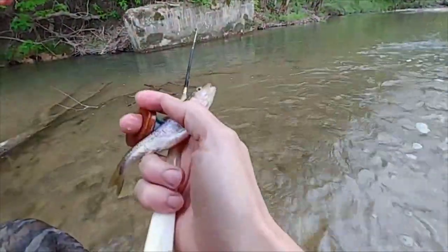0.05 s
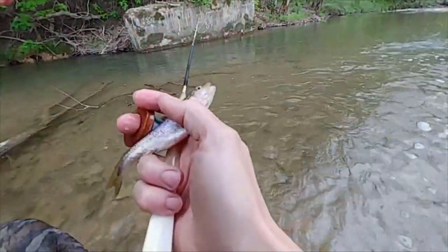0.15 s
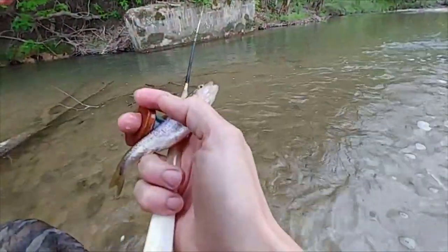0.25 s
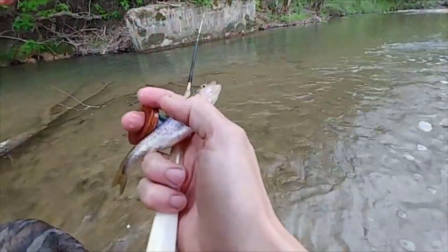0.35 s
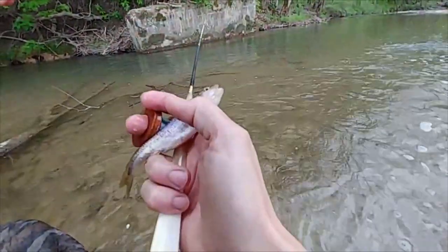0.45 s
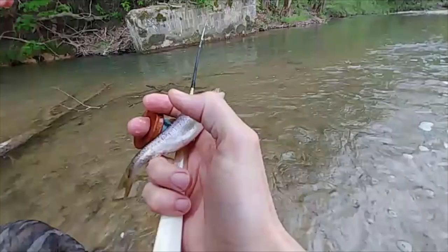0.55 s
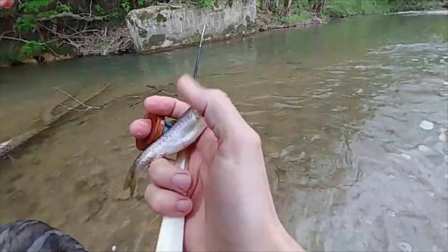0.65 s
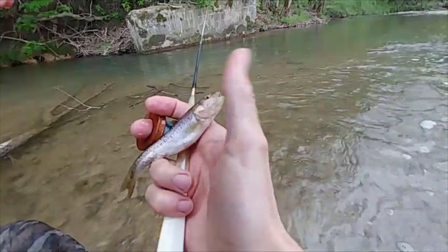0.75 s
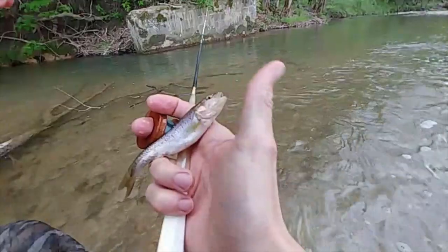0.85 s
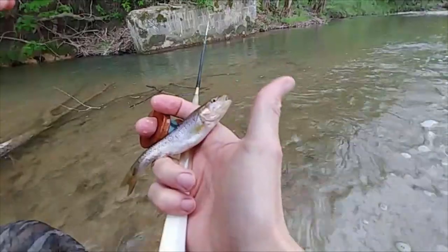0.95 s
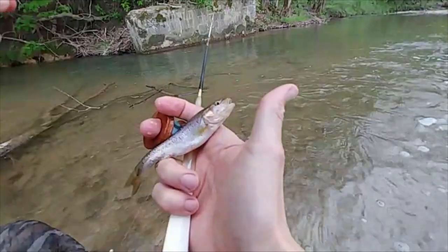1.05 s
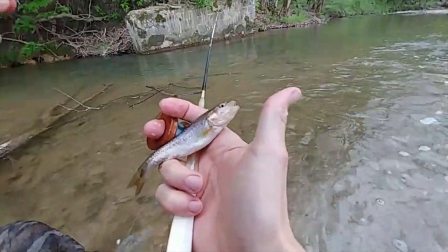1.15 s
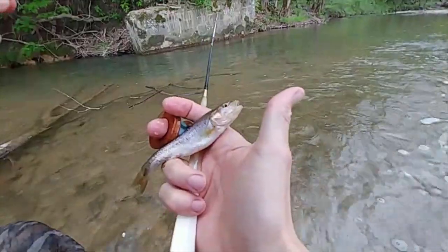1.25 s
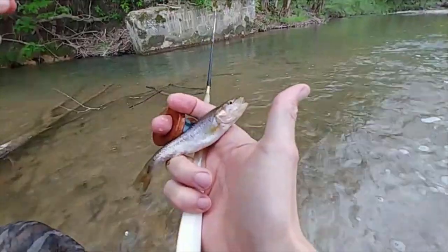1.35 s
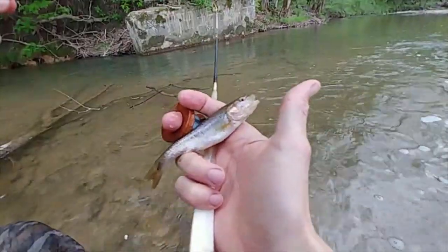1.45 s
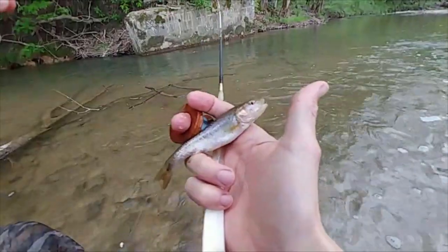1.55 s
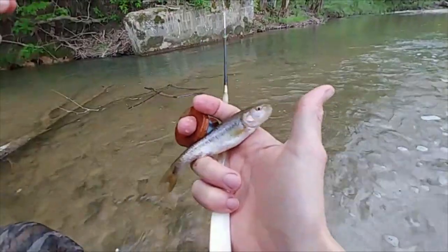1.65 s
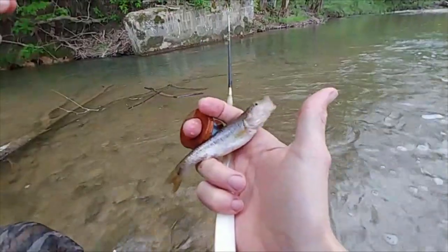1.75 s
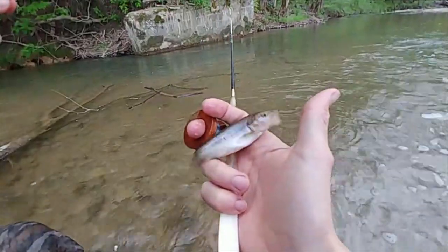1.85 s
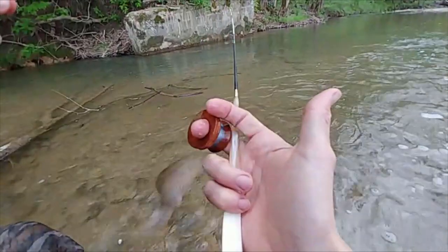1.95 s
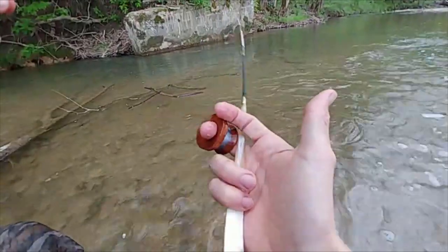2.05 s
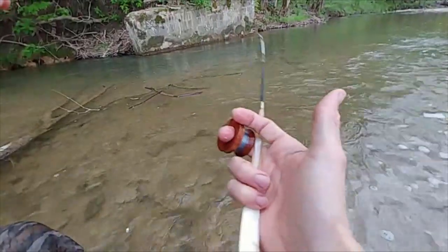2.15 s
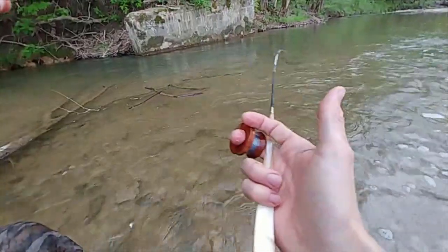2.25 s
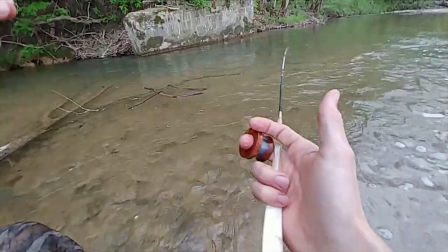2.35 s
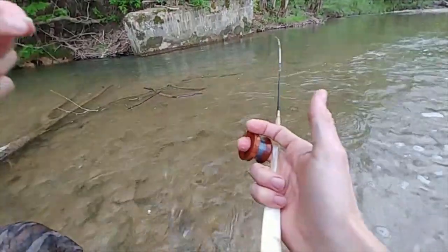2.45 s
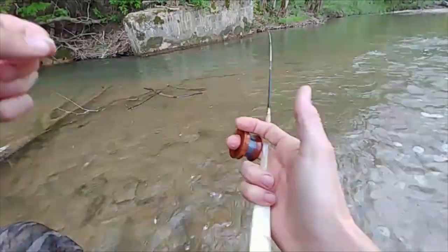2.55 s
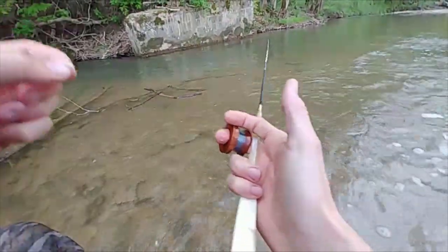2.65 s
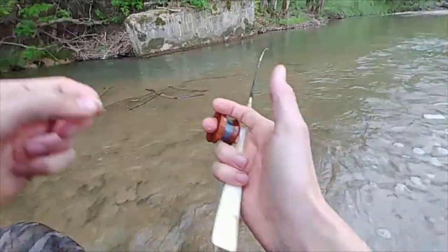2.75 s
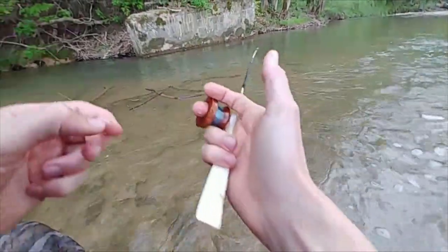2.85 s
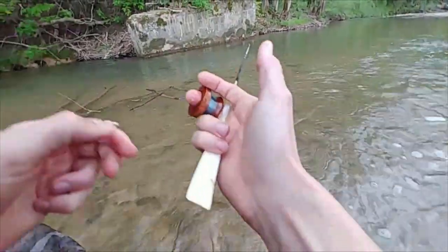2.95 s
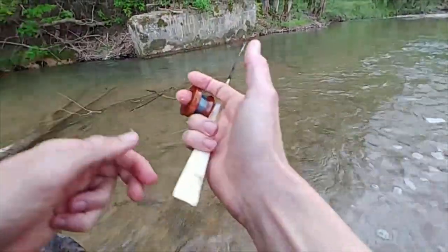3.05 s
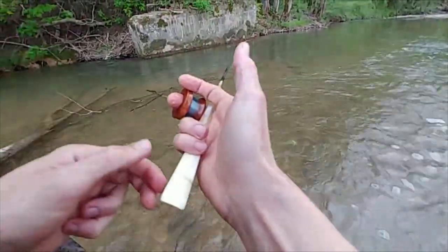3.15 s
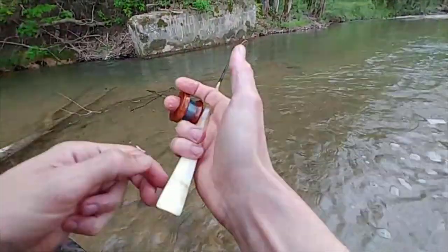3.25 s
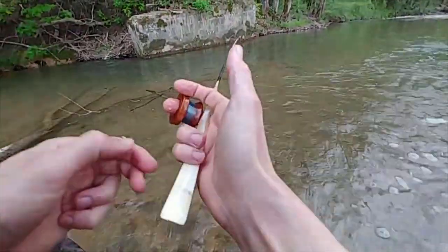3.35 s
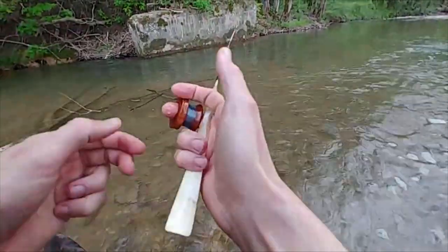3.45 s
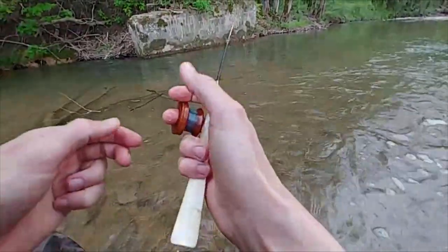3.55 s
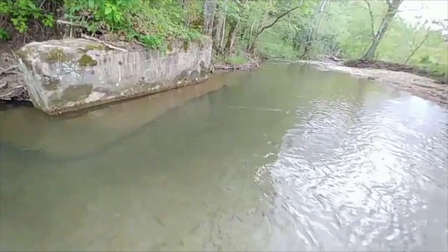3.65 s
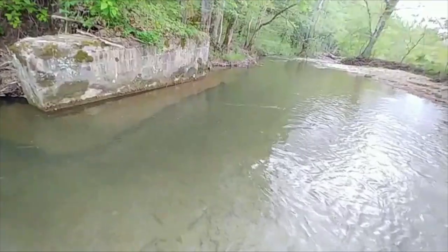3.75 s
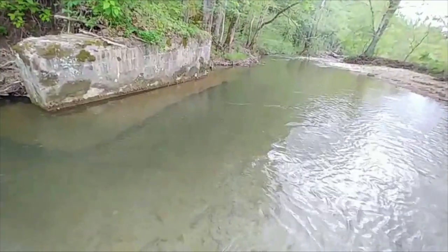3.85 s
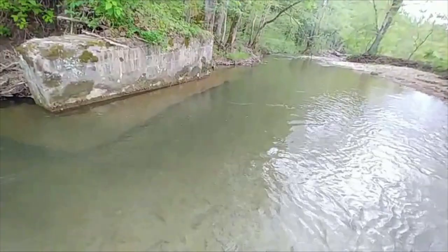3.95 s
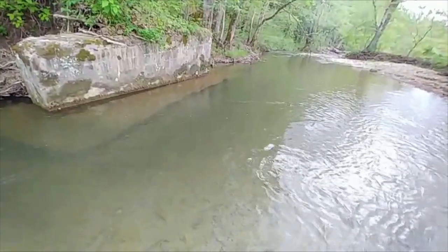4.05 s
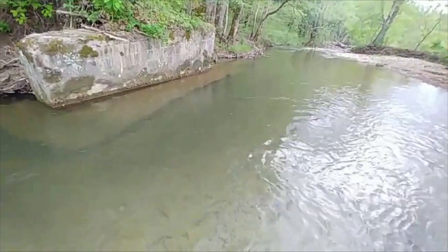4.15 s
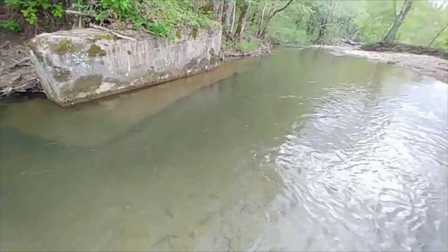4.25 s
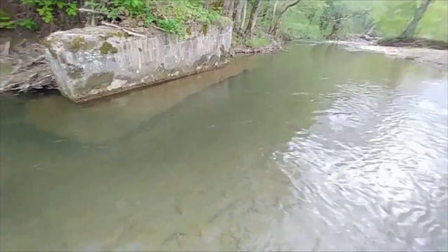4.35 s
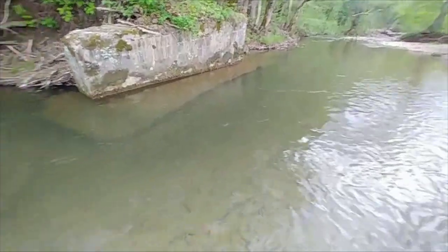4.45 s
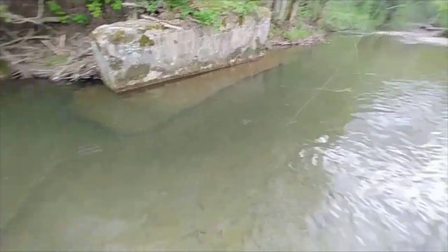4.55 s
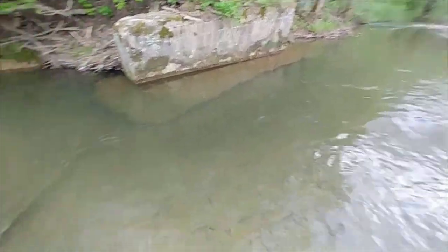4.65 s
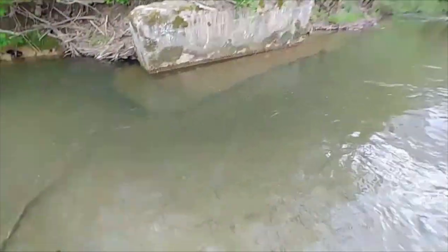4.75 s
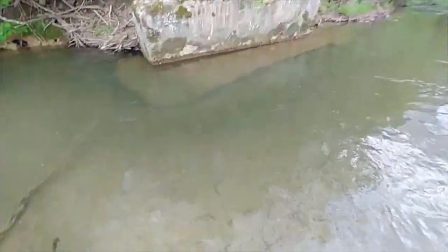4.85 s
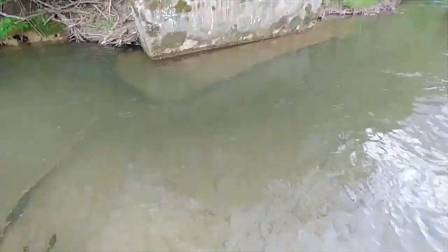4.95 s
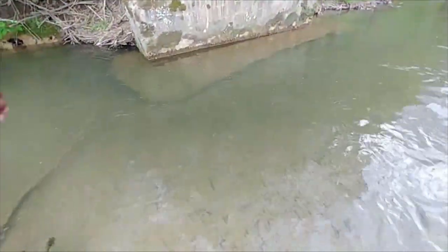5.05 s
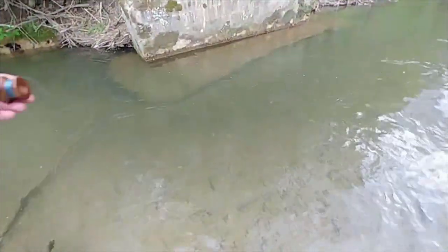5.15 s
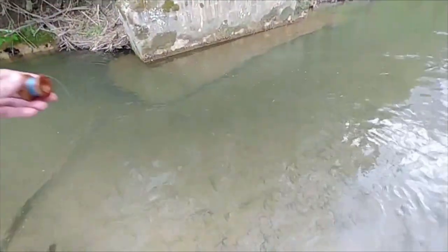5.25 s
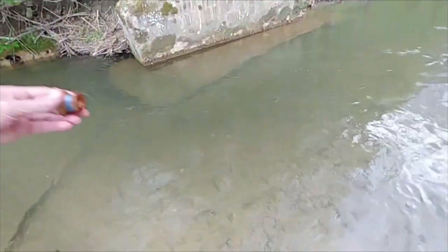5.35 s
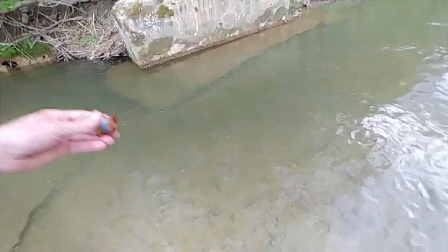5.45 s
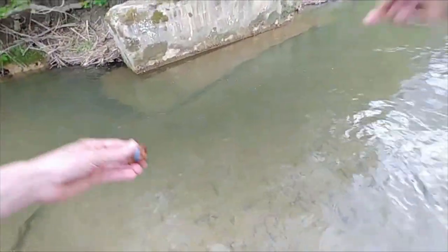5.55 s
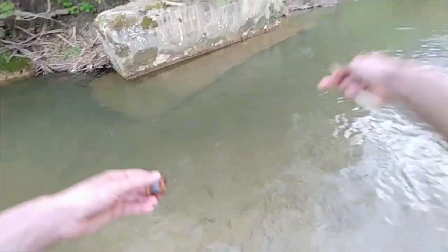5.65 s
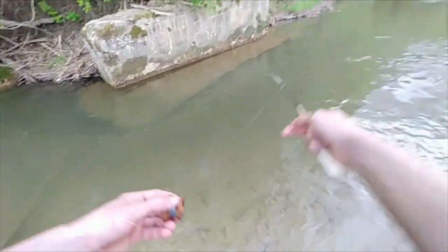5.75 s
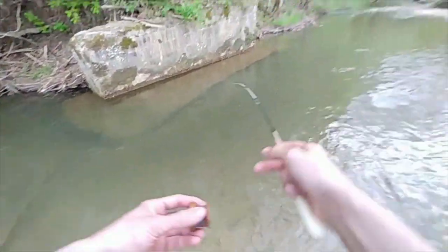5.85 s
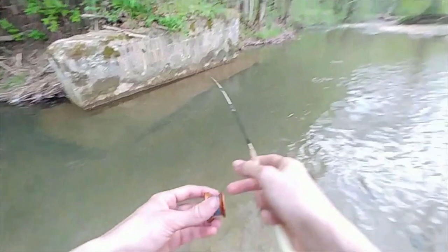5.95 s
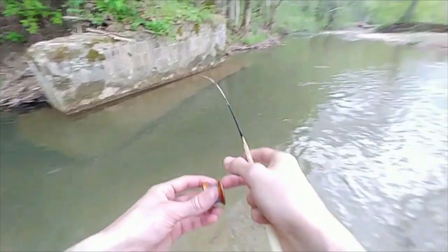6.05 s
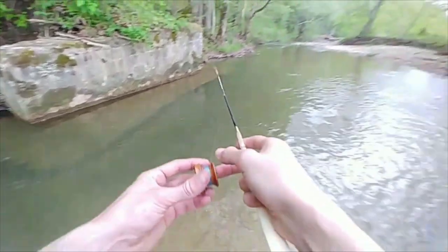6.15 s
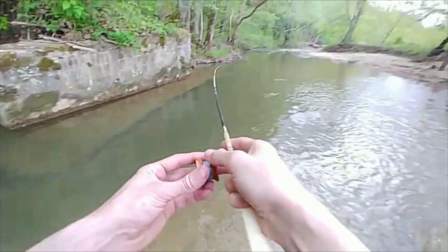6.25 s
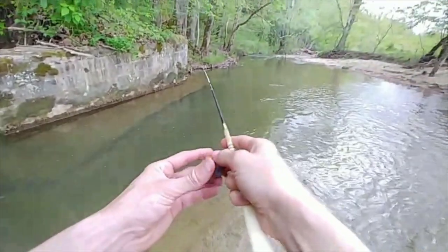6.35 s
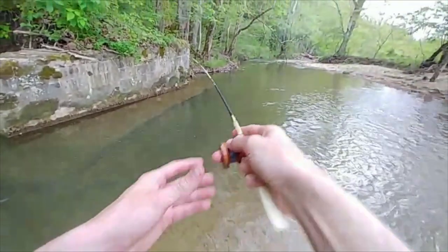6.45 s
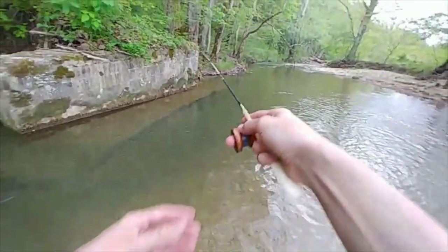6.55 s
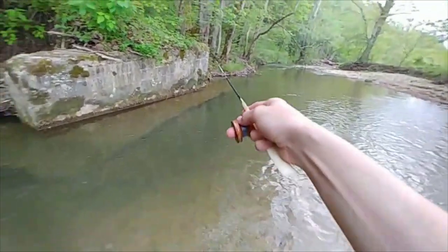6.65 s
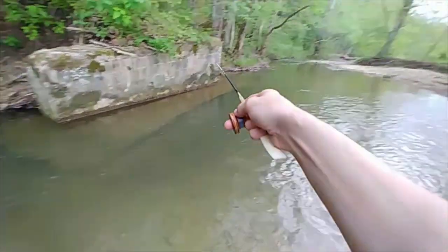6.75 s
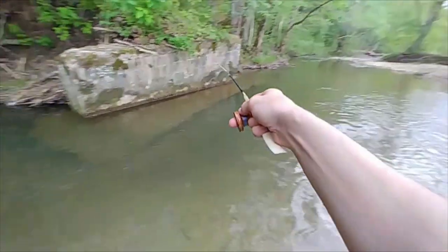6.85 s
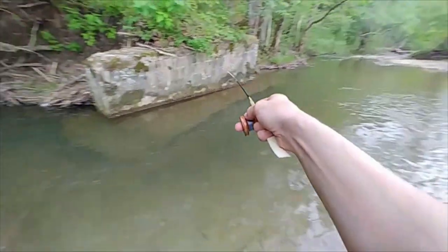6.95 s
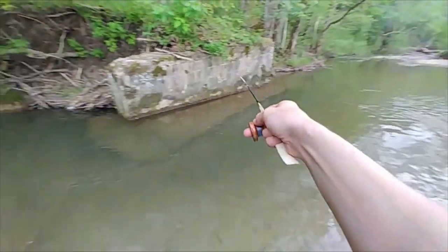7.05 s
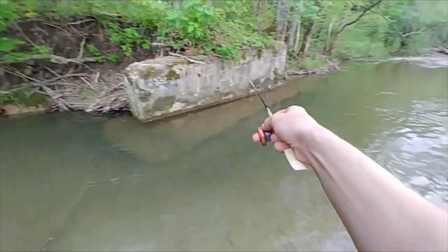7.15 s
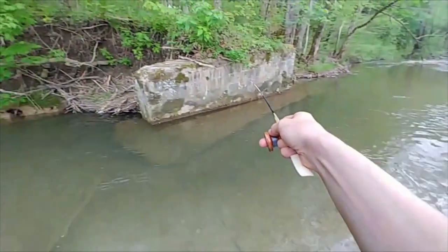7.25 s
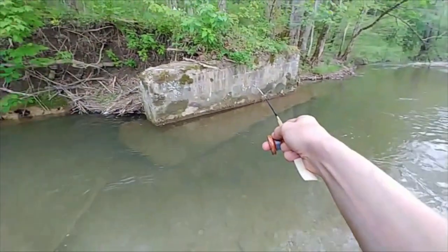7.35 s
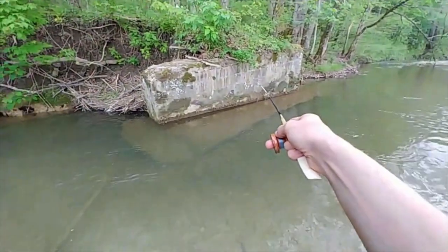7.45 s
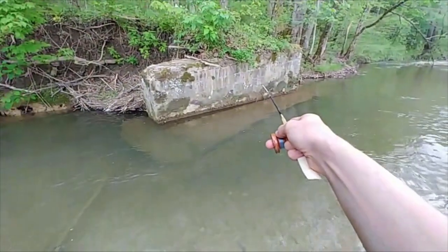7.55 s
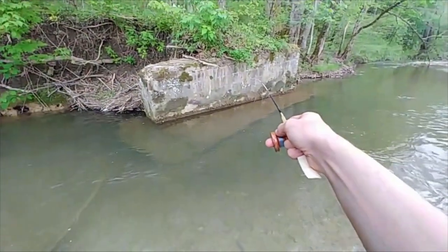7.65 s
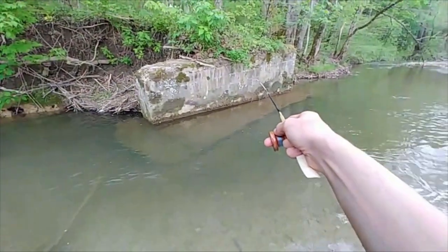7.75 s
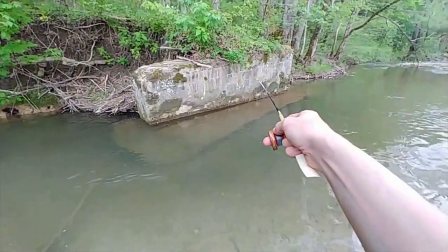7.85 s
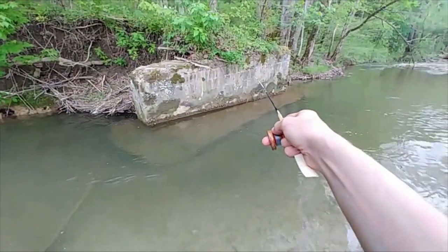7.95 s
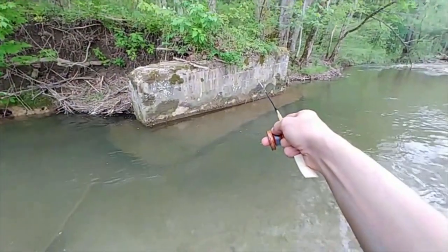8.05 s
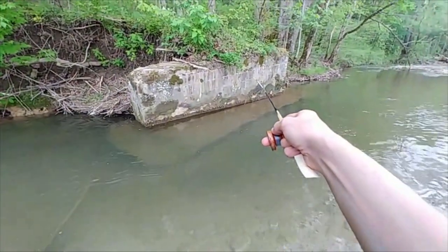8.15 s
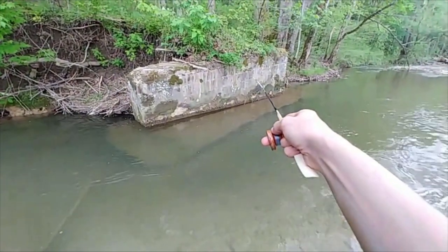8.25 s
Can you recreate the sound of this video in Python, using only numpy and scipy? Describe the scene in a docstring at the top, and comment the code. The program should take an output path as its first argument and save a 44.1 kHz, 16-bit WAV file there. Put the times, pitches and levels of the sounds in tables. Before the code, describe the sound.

A shallow creek trickles softly throughout, a patchy low babble with fine fizz and small ringing bubbles, over faint microphone hiss. From 0 to 3.6 s a low unsteady drone and rumble lies beneath, strongest at the start. Tiny tackle ticks occur at the beginning and 0.5 s; at 0.36 s a hollow gulp rises in pitch, followed by gurgles. A soft low bump comes near 1.5 s. At 2.2, 2.28 and 2.36 s the released fish makes three abrupt, very loud wet slaps, bright and crackling, with drops and mist dying quickly. A smaller plip and spatter follow at 2.56 s. Ticks and bubbles return around 2.9-3.3 s. At 3.6 s the drone drops out and the water quietens; dull camera bumps land at 3.9-4.3 s. Calm water continues, with a tick at 5.7 s, low gurgles around 6.4 s, faint thin hum near 6.6 and 7.4 s, a tiny splash at 7.3 s and light ticks from 7.9 s.

```python
"""A shallow creek trickles over a riffle: patchy filtered noise mixed with swarms of tiny ringing bubbles.
A released fish slaps and spatters the surface (short pings, noise cracks, falling drops), air pockets gulp
as damped tones that rise in pitch, tackle ticks and the camera is bumped (pings and puffs of noise).
Unsteady far tones make a low drone at first; a thin hum stands out later.
All of it passes a small camera's microphone port, which rings near 6 kHz."""
import sys
import numpy as np
from scipy import signal
from scipy.fft import rfft, irfft, next_fast_len
from scipy.io import wavfile
from scipy.ndimage import uniform_filter1d, map_coordinates

SR = 44100
rng = np.random.default_rng(int(sys.argv[2]) if len(sys.argv) > 2 else 0)


def persist_wave(psi):
    """Save psi, clipped to +-1, as 16-bit WAV."""
    counts = np.round(np.clip(psi, -1, 1) * 32767).astype(np.int16)
    wavfile.write(sys.argv[1], SR, np.atleast_2d(counts).T)


N = 366030
TIME = np.arange(N) / SR  # seconds

# How strong the water is, before its random wavering: t/s, light babble level/dB, fizz level/dB
FLOW_LEVELS = [(0, -55.5, -59.5), (.7, -58, -61.5), (1.0, -56.5, -61), (1.6, -58.5, -61.5),
               (2.1, -58.5, -61.5), (2.9, -59.5, -60.5), (3.2, -55.5, -59), (3.6, -58.5, -62.5),
               (3.75, -61.5, -65), (4.8, -61.5, -65), (5.1, -56.5, -65), (5.8, -60, -62.5),
               (6.3, -63, -67.5), (6.9, -59.5, -64.5), (7.3, -58.5, -61), (7.6, -58.5, -63),
               (8.3, -60.5, -62.5)]
# Tone colour of the babble, only relative levels count: f/Hz, level/dB
BABBLE_COLOUR = [(88, -12), (150, -0.5), (233, -12), (297, 0), (362, -3.5), (519, -2), (625, 0),
                 (752, -1.5), (1750, -8.5), (2400, -9.5), (3120, -71), (5280, -120)]
# Tone colour of the fizz, only relative levels count: f/Hz, level/dB
FIZZ_COLOUR = [(1900, -52), (2400, -1), (2850, -2.5), (3500, -6), (4400, -13), (6000, -10.5), (9000, -17.5),
               (15500, -26)]
# The deep babble steps down to a quieter level: when (s), and its level before and after (dB)
STEP_S, DEEP_BEFORE_DB, DEEP_AFTER_DB = 3.62, -56.5, -58.5


def creek():
    """Far ripples merge into patchy noise; near bubbles and droplets stand out of it."""
    light_db, fizz_db = curves(FLOW_LEVELS)
    deep_db = np.where(TIME < STEP_S, DEEP_BEFORE_DB, DEEP_AFTER_DB) + 0.76 * wobble(3)

    babble = unit(filtered(patchy(patchy_db=2.5), colour(BABBLE_COLOUR)))
    near_bubbles = swarm(count=1200, hz=1000.0, spread=0.5, cycles=9.06, scatter_db=3, size=1400)
    babble += 0.51 * amp(1.5 * wobble(6)) * near_bubbles
    # split the babble at about 1 kHz, so that each part has its own level
    deep = filtered(babble, lambda f: 1 / (1 + (f / 1000) ** 6))
    light = babble - deep
    babble = amp(deep_db) * unit(deep) + amp(light_db + 0.7 * wobble(2.993)) * unit(light)

    fizz = unit(filtered(patchy(patchy_db=0.4), colour(FIZZ_COLOUR)))
    fizz += 0.13 * swarm(count=1200, hz=9000, spread=0.4, cycles=0.5, scatter_db=3, size=64)
    # small bubbles come in clumps
    small_bubbles = swarm(count=2500, hz=2702, spread=0.248, cycles=9.95, scatter_db=4.0, size=500)
    fizz += 0.47 * amp(3.4 * wobble(7)) * small_bubbles
    fizz *= amp(fizz_db + 0.41 * wobble(22))

    surge_db = 0.86 * wobble(9)  # lifts and lowers all the water together
    return amp(surge_db) * (babble + fizz)


# Slaps on the water: t/s, ping peak level/dB after the port, f/Hz, life/s,
# bright crack energy level/dB, dull smack energy level/dB
WATER_SLAPS = [(2.1956, -9.5, 6740, 0.00038, 2, -1), (2.196, -6, 6240, 0.00061, -7, 0),
               (2.2757, -7, 6850, .001, 3.5, 2.5), (2.282, -11.5, 7640, 0.0005, -11.5, -8),
               (2.3574, -4.5, 6260, .00044, 5.5, -12), (2.36, -16, 6160, .00039, -23.5, -12),
               (7.3118, -33, 6180, 0.00087, -44, -25)]
# Large drops falling back: t/s, ping peak level/dB after the port, bright crack energy level/dB
LARGE_DROPS = [(2.2095, -29, -30), (2.229, -31, -23.5), (2.263, -21, -7), (2.2972, -28, -29.5),
               (2.32, -18.5, -18), (2.336, -28, -14), (2.349, -36, -14), (2.354, -21, -21.5),
               (2.371, -24, -19.5), (2.38, -26, -29.5), (2.5604, -32, -40), (2.565, -35, -45),
               (2.581, -33, -45), (2.589, -33, -45), (2.5947, -26, -45)]
DROP_HZ, DROP_S, DROP_SMACK_DB = 6050, 0.00085, -1  # pitch, life, smack energy against the peak
# Throws of spray: t/s, fine drops level/dB, mist level/dB
SPRAY_THROWS = [(2.196, -44.5, -45), (2.262, -58, -42), (2.285, -47.5, -48), (2.31, -50, -60),
                (2.345, -63, -46.5), (2.36, -47.5, -49.5), (2.556, -56, -80)]
# seconds to rise, and seconds for drops and mist to fall by 60 dB
SPRAY_RISE_S, DROPS_T60, MIST_T60 = 0.0035, 0.32, 0.34


def splash():
    """Each slap is a millisecond ping with a bright crack and a duller smack; fine drops rattle down."""
    drop_rows = [(t, db, DROP_HZ, DROP_S, crack_db, db + DROP_SMACK_DB) for t, db, crack_db in LARGE_DROPS]
    s, db, hz, life, crack_db, smack_db = np.transpose(WATER_SLAPS + drop_rows)
    bright, dull, t = np.zeros(N), np.zeros(N), np.arange(256) / SR
    starts = np.round(s * SR).astype(int)
    for start, length, high_db, low_db in zip(starts, life, crack_db, smack_db):
        # two noise bits that swell and fade; the second one lasts longer
        noise = rng.standard_normal((2, 256)) * t / length * np.exp(-t / length * [[2.5], [1.2]])
        noise /= np.linalg.norm(noise, axis=1, keepdims=True)
        bright[start:][:256] += amp(high_db) * noise[0]
        dull[start:][:256] += amp(low_db) * noise[1]
    cracks = filtered(bright, lambda f: mode(f, 11200, 10300, 0) ** 2)
    smacks = filtered(dull, lambda f: mode(f, 2000, 4800, 0))

    drops = swarm(count=30000, hz=5900, spread=0.12, cycles=3, scatter_db=3.0, size=96)
    mist = swarm(count=40000, hz=11500, spread=0.27, cycles=3, scatter_db=4.0, size=48)
    _, drops_db, mist_db = np.transpose(SPRAY_THROWS)
    falling = spray(drops_db, DROPS_T60) * drops + spray(mist_db, MIST_T60) * mist
    return ticks(s, db, hz, life) + cracks + smacks + falling


def spray(level_db, t60):
    """Strength of the falling spray: every throw rises fast and dies away, and their powers add."""
    power, age = np.zeros(N), TIME[:SR // 2]
    for (s, *_), db in zip(SPRAY_THROWS, level_db):
        strength = amp(db - 60 * age / t60) * (1 - np.exp(-age / SPRAY_RISE_S))
        power[round(s * SR):][:len(age)] += strength ** 2
    return np.sqrt(power)


# Air pockets, large gulps and the small ones trapped under slaps:
# t/s, level/dB before the soft start and fade, starting f/Hz, life/s, share the pitch rises in one life
AIR_POCKETS = [(0.3627, -17.5, 348, .036, 0.74), (2.1959, -20, 2800, 0.0033, 0),
               (2.196, -27, 1760, .0046, 0.037), (2.2773, -26.5, 2000, 0.0022, 0),
               (2.358, -25.5, 804, 0.0038, 0), (2.359, -14, 1260, 0.0021, .5),
               (2.561, -32.5, 4030, .003, 0.33), (2.593, -32, 357, 0.046, 0.45)]
# Single bubbles: t/s, level/dB before the soft start and fade, starting f/Hz
SINGLE_BUBBLES = [(.058, -34.5, 1490), (.657, -42, 713), (.788, -33.5, 1940), (.815, -36.5, 1490),
                  (1.09, -44, 3000), (1.098, -42, 735), (1.105, -46, 3500), (1.294, -41, 383),
                  (1.417, -41.5, 940), (1.477, -36.5, 1350), (1.554, -39.5, 1260), (1.625, -39.5, 657),
                  (2.308, -40, 762), (2.724, -39, 740), (2.998, -40.5, 1050), (3.252, -34, 1330),
                  (3.306, -36.5, 337), (5.679, -41, 1440), (5.819, -43, 1320), (5.864, -38, 295),
                  (6.019, -44, 279), (6.06, -41.5, 288), (6.974, -38, 370), (7.126, -39, 610),
                  (7.635, -39.5, 457), (7.74, -44, 1310), (7.754, -43, 851), (8.234, -40.5, 1950)]
# Puffs of band noise in the water: gurgles, slap wash, one thin whistling tone:
# t/s, length/s, centre f/Hz, width f/Hz, level/dB
WATER_PUFFS = [(.2, 0.11, 920, 300, -53.5), (.405, .028, 540, 400, -40), (.432, 0.047, 694, 300, -46),
               (.475, 0.028, 770, 250, -54), (.79, .05, 2000, 500, -56), (1.71, .044, 1080, 250, -56),
               (2.196, 0.08, 320, 295, -43.5), (2.2, .15, 2500, 3000, -54.5),
               (2.359, 0.041, 1420, 1300, -45.5), (2.65, 0.029, 700, 500, -55.5),
               (3.261, 0.068, 484, 507, -52.5), (4.4, 0.35, 1760, 500, -63), (4.88, .2, 1300, 400, -60),
               (4.95, .4, 3120, 1000, -65.5), (4.96, .22, 2760, 80, -68), (5.36, 0.091, 2720, 600, -65),
               (5.65, .068, 1370, 400, -54), (5.68, .04, 2880, 800, -57.5), (6.4, 0.058, 350, 201, -54.5),
               (6.5, 0.092, 282, 120, -58), (7.28, .098, 2600, 1600, -57.5)]
SWELL = 0.15  # a pocket's swell as a share of its life
CYCLES_AT_1K, CYCLES_GROW = 6.24, 0.31  # a bubble's life in cycles; high ones ring more cycles


def gulps():
    """Trapped air rings like a small bell and rises in pitch; puffs of band noise add rougher water."""
    s, db, hz = np.transpose(SINGLE_BUBBLES)
    life = CYCLES_AT_1K * (hz / 1000) ** CYCLES_GROW / hz
    bubbles = rings(s, db, hz, life, 0.038, 1.55 / hz, size=2048)
    s, db, hz, life, rise = np.transpose(AIR_POCKETS)
    pockets = rings(s, db, hz, life, rise, SWELL * life, size=4096, order=4)
    return pockets + bubbles + bursts(WATER_PUFFS, lean=0.34)


# Ticks of the tackle: t/s, peak level/dB after the port
TACKLE_TICKS = [(0.0133, -29.5), (.039, -36), (0.4992, -23), (.6669, -38), (0.8173, -38), (.9623, -35),
                (1.1677, -35), (1.4157, -35), (1.7629, -39), (2.8785, -32.5), (3.1326, -28), (3.5783, -39),
                (5.7389, -29.5), (5.9266, -40), (7.0375, -38), (7.9099, -32.5), (8.0054, -39), (8.21, -30)]
TICK_HZ, TICK_S = 6130, 0.00081  # pitch and life
# Short puffs of high noise: hisses, splash hiss and brief ticks: t/s, length/s, centre f/Hz, level/dB
HIGH_PUFFS = [(0.039, .048, 7260, -60), (0.498, .067, 6770, -61), (2.557, 0.1, 5500, -56.5),
              (3.126, 0.058, 8500, -59.5), (5.72, 0.09, 6400, -64.5), (7.035, 0.066, 5730, -66),
              (7.31, .027, 6500, -63), (6.754, .005, 3250, -54), (7.401, .004, 3300, -48.5),
              (7.456, .008, 3760, -55), (7.902, 0.032, 8000, -65), (8.005, 0.024, 5900, -65),
              (8.202, 0.074, 9600, -60)]
PUFF_WIDTH = 0.41  # share of the centre
# Bumps of the camera: t/s, length/s, centre f/Hz, width f/Hz, level/dB
CAMERA_BUMPS = [(1.46, 0.085, 95.8, 30, -42.5), (3.935, 0.11, 74.5, 63, -35.5),
                (3.94, 0.12, 134, 110, -44.5), (4.07, 0.024, 60.4, 50, -48), (4.24, 0.06, 63, 50, -39.5),
                (6.72, 0.091, 60, 50, -54), (7.29, 0.072, 120, 100, -63), (7.91, 0.043, 60, 50, -60)]


def tackle():
    """Tackle ticks are tiny pings, joined by puffs of high noise; camera bumps are puffs of low noise."""
    s, db = np.transpose(TACKLE_TICKS)
    puffs = [(t, length, hz, PUFF_WIDTH * hz, level) for t, length, hz, level in HIGH_PUFFS]
    return ticks(s, db, TICK_HZ, TICK_S) + bursts(puffs, lean=0.45) + bursts(CAMERA_BUMPS, lean=0.78)


# Drone level before its random wavering: t/s, level/dB
DRONE_LEVELS = [(0, -43.5), (.38, -47), (.65, -51.5), (1.0, -49), (1.3, -52.5), (2.3, -52.5), (2.7, -58),
                (3.1, -54), (3.58, -55), (3.68, -70), (8.3, -72)]
# Tones in the drone: f/Hz, relative level/dB, pitch wander f/Hz
DRONE_TONES = [(55, -7, 1.04), (75, 0, 0.76), (92.2, -4, 1.5), (103.1, -3.5, 2.24), (369, -10.5, 4.05),
               (721, -11.5, 10.83)]
# Hum level: t/s, level/dB
HUM_LEVELS = [(0, -63), (3.6, -67), (4.5, -64.5), (6.6, -59.5), (7, -69.5), (7.4, -61), (8.3, -76)]
HUM_HZ = 131
# Tone colour of the soft low wash, only relative levels count: f/Hz, level/dB
WASH_COLOUR = [(15, -44), (25, -11), (80, -19), (129, 2), (184, -9.5), (250, -1.5), (320, -46), (550, -120)]


def distance():
    """A drone of unsteady low tones over rumble, a wavering hum and a soft low wash of noise."""
    tones = [amp(db) * wavering(hz, wander_hz, swing_db=2.5) for hz, db, wander_hz in DRONE_TONES]
    drone = unit(sum(tones))
    rumble = filtered(rng.standard_normal(N), lambda f: mode(f, 82, 60, 0) ** 2)
    drone += 0.31 * unit(rumble)
    drone *= amp(curves(DRONE_LEVELS)[0] + 1.3 * wobble(3.97))
    hum = amp(curves(HUM_LEVELS)[0]) * wavering(HUM_HZ, wander_hz=1.68, swing_db=0.7)
    wash = unit(filtered(rng.standard_normal(N), colour(WASH_COLOUR)))
    return drone + hum + amp(-65.5 + 1.4 * wobble(4.4)) * wash


def wavering(hz, wander_hz, swing_db):
    """A tone of rms 1 whose pitch and strength are unsteady."""
    phase = 2 * np.pi * np.cumsum(hz + wander_hz * wobble(12)) / SR
    return unit(np.sin(phase) * amp(swing_db * wobble(9)))


def amp(db):
    """Turn decibels into a plain factor."""
    return 10 ** (np.asarray(db) / 20)


def unit(x):
    """Scale a sound to rms 1."""
    return x / np.sqrt(np.mean(x ** 2) + 1e-20)


def curves(rows):
    """One value per sample for each column after the time."""
    s, *cols = np.transpose(rows)
    return [np.interp(TIME, s, c) for c in cols]


def wobble(rate):
    """A smooth random curve with rate random points a second."""
    return map_coordinates(rng.standard_normal(int(N * rate / SR) + 4), [TIME * rate])


def filtered(x, response):
    """Filter x by multiplying its spectrum with a response of frequency."""
    m = next_fast_len(len(x) + 8192)  # spare room for the ringing
    return irfft(rfft(x, m) * response(np.fft.rfftfreq(m, 1 / SR)), m)[:len(x)]


def colour(points):
    """The gain through (f/Hz, level/dB) points, joined on a log frequency axis."""
    f, db = np.transpose(points)
    return lambda hz: amp(np.interp(np.log(hz + 1), np.log(f), db))


def mode(f, hz, width_hz, db):
    """One resonance: strongest at hz, narrower for a smaller width."""
    return amp(db) * 1j * f * width_hz / (hz * hz - f * f + 1j * f * width_hz)


def patchy(patchy_db):
    """White noise with patches of random gain in time and frequency."""
    z = signal.stft(rng.standard_normal(N + 512), nperseg=512)[2]
    field = uniform_filter1d(rng.standard_normal(z.shape), size=5, axis=0)  # smooth over frequency
    field = uniform_filter1d(field, size=8, axis=1)  # smooth over time
    return signal.istft(z * amp(patchy_db * unit(field)), nperseg=512)[1][:N]


def rings(s, db, hz, life, rise, swell, size, order=2):
    """Sum of damped sines, soft at the start, climbing as they die; a high order ends them abruptly."""
    t = np.arange(size) / SR
    settings = (s, db, hz, life, rise, swell)
    s, db, hz, life, rise, swell = (np.broadcast_to(v, np.shape(s))[:, None] for v in settings)
    u = t / life
    envelope = amp(db) * (1 - np.exp(-t / swell)) * np.exp(-u ** order)
    wave = envelope * np.sin(2 * np.pi * hz * t * (1 + rise * u * u / 3))
    where = np.round(s * SR).astype(int) + np.arange(size)
    return np.bincount(where.ravel(), wave.ravel(), N + size)[:N]  # adds every ring at its place


def swarm(count, hz, spread, cycles, scatter_db, size):
    """Random bubbles of rms 1 in total: log-normal pitch, a few louder than most."""
    u, g = rng.random((count, 2)), rng.standard_normal(count)
    pitch = np.clip(hz * np.exp(spread * g), 200, 15000)
    size_db = -scatter_db * np.log(u[:, 1] + 0.0076)
    return unit(rings(u[:, 0] * N / SR, size_db, pitch, cycles / pitch, 0.242, 1 / pitch, size))


def bursts(rows, lean):
    """Puffs of band noise; a small lean puts the peak early."""
    out = np.zeros(N + SR)
    for s, length, hz, width_hz, db in rows:
        u = np.linspace(0, 1, round(length * SR))
        band = filtered(rng.standard_normal(len(u)), lambda f: np.exp(-((f - hz) / width_hz * 2) ** 4))
        puff = unit(band * np.sin(np.pi * u ** lean) ** 0.5)
        out[round(s * SR):][:len(u)] += amp(db) * puff
    return out[:N]


def ticks(s, db, hz, life):
    """Short pings whose peaks are given as they leave the port, so its gain is taken off first."""
    port_db = 20 * np.log10(np.abs(1 + mode(hz, *MIC_PORT)))
    # 8.5 dB makes up for the soft start and quick fade
    return rings(s, db - port_db + 8.5, hz, life, 0.012, life * 0.28, size=256)


def scattered(x, t60, db):
    """The rippled surface and the banks return a short rough tail."""
    t = np.arange(SR // 10) / SR
    tail = rng.standard_normal(len(t)) * amp(-60 * t / t60) * (t > 0.0015)
    return x + amp(db) * signal.fftconvolve(x, tail / np.linalg.norm(tail))[:N]


def scene():
    """Near sounds get the short tail; the creek and the distance are added to them."""
    near = scattered(gulps() + splash() + tackle(), t60=0.04, db=-16)
    return (creek() + near + distance())[None]


# Resonance of the microphone port: centre f/Hz, width f/Hz, level/dB of the added resonance
MIC_PORT = (5980, 770, 17.9)
# Band that the housing cancels: centre f/Hz, width f/Hz, level/dB of what is taken away
HOUSING_NOTCH = (2386, 390, -3.5)
CEILING, TOP_HZ = 0.9, 15850  # level that peaks bend towards (full scale is 1); band limit


def record(dry):
    """The port lifts one band, the housing dims another, the preamp hisses and rounds off the highest peaks;
    nothing is kept above the band limit."""
    heard = filtered(dry[0], lambda f: (1 + mode(f, *MIC_PORT)) * (1 - mode(f, *HOUSING_NOTCH)))
    hiss = filtered(rng.standard_normal(N), colour([(5000, -30), (8000, -3), (15000, 2.0)]))
    heard += amp(-74.5) * unit(hiss)
    heard /= (1 + np.abs(heard / CEILING) ** 4) ** 0.25
    return filtered(heard, lambda f: f < TOP_HZ)[None]


dry = scene()
out = record(dry)
persist_wave(out)
```